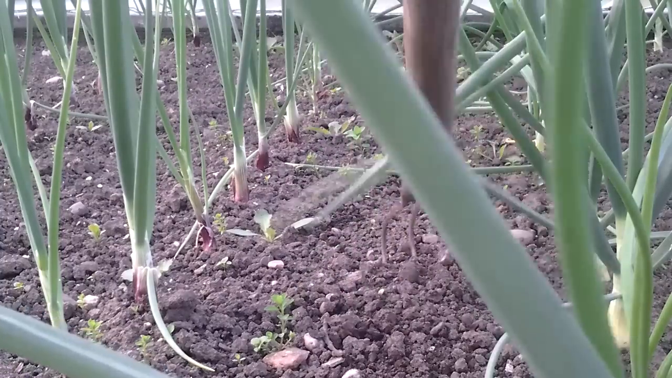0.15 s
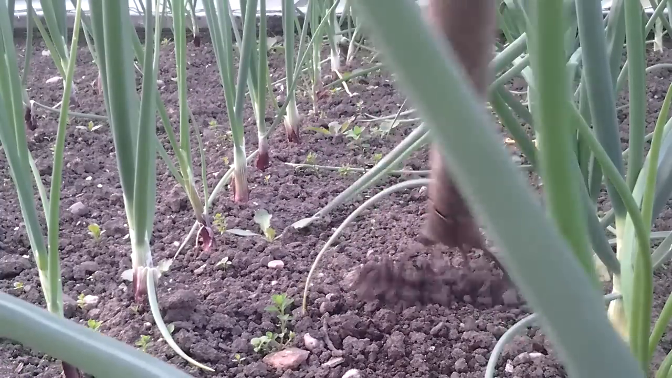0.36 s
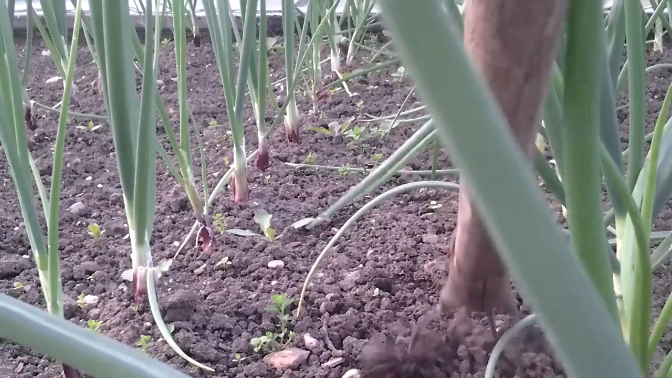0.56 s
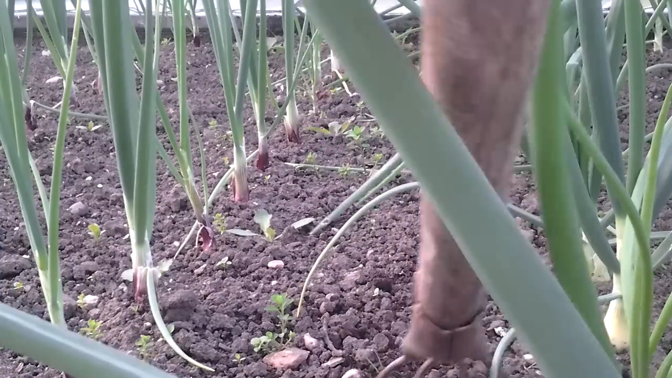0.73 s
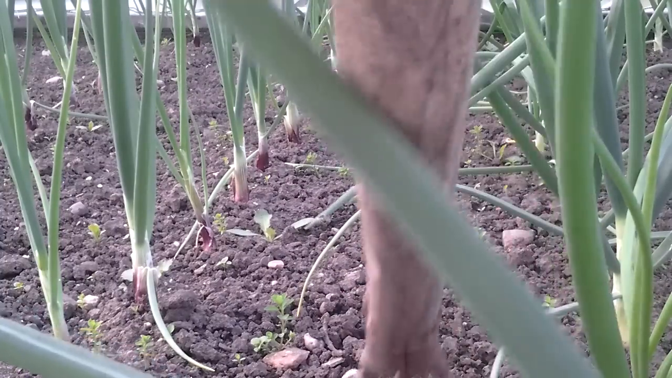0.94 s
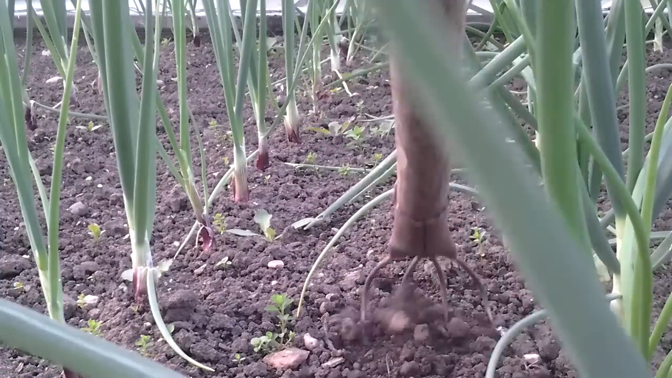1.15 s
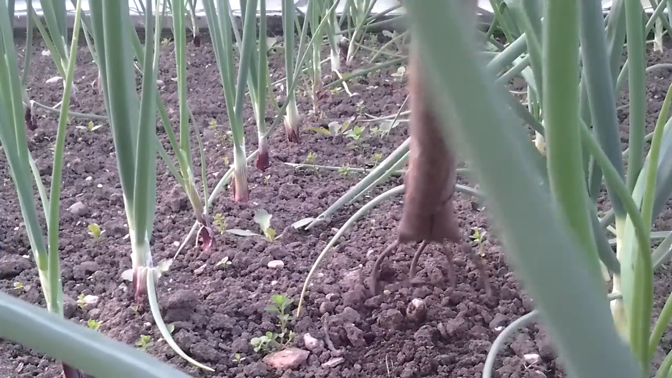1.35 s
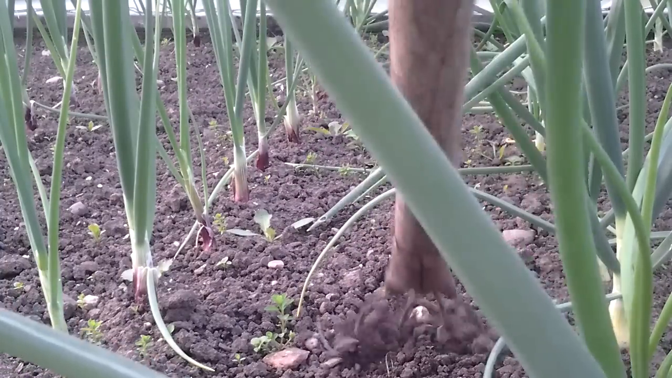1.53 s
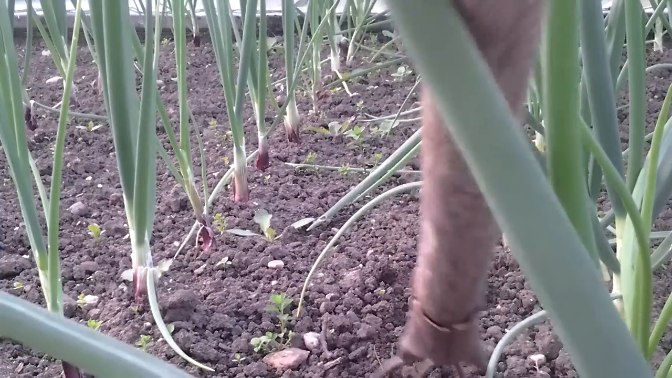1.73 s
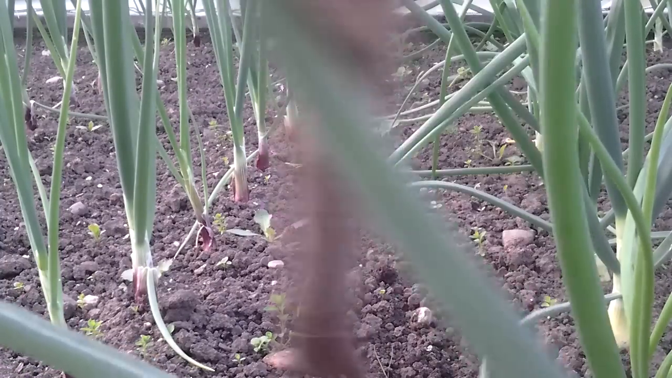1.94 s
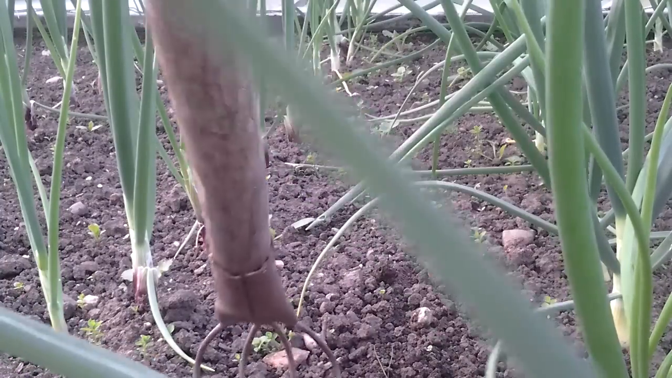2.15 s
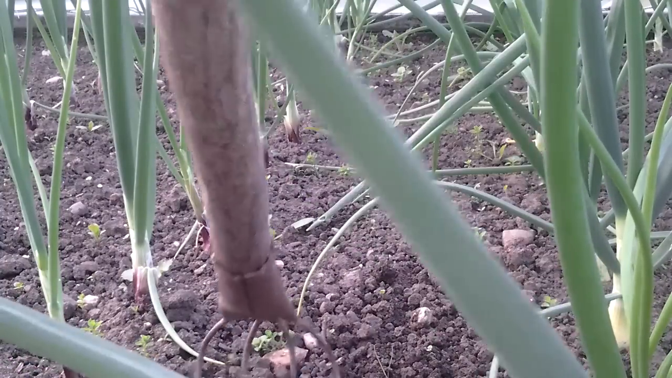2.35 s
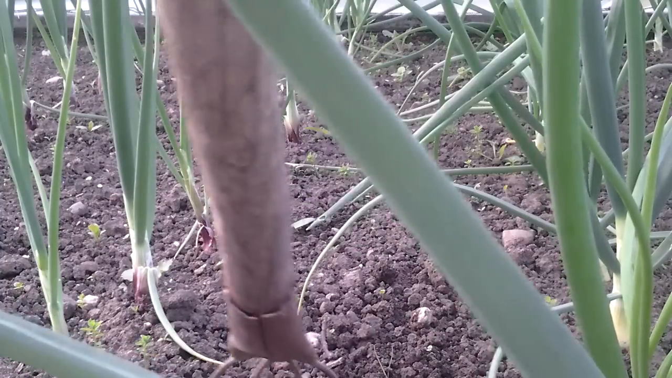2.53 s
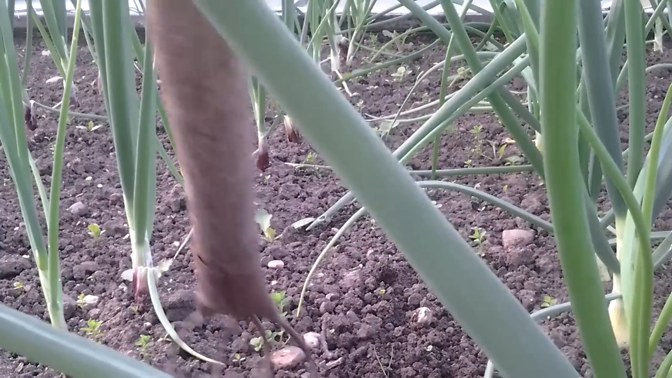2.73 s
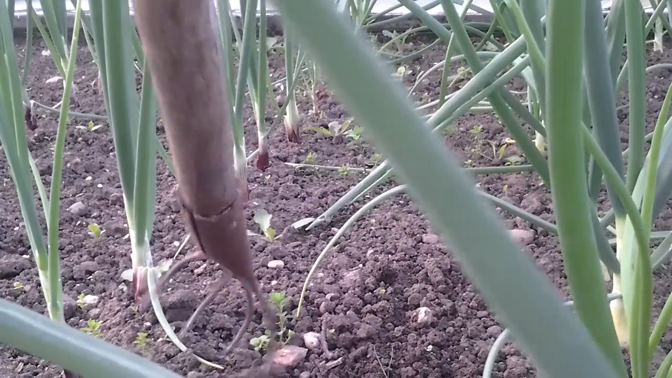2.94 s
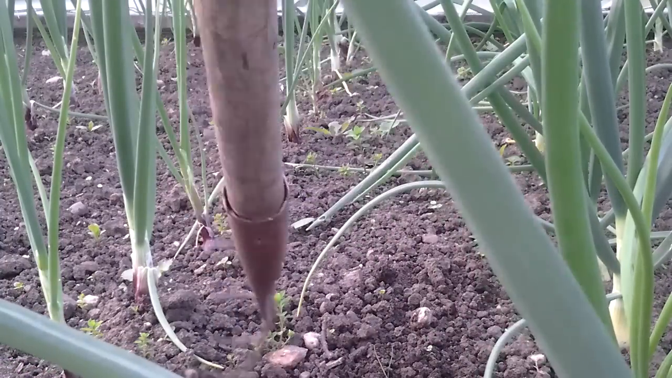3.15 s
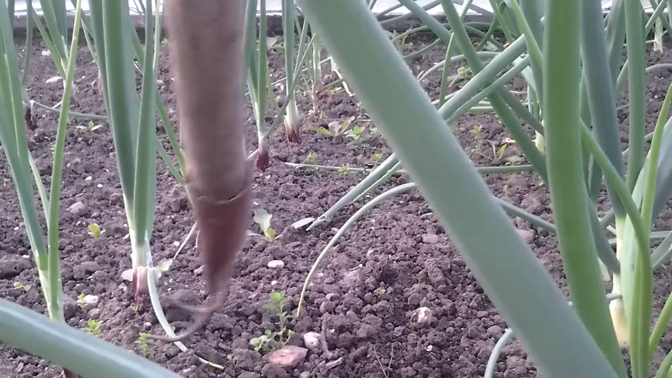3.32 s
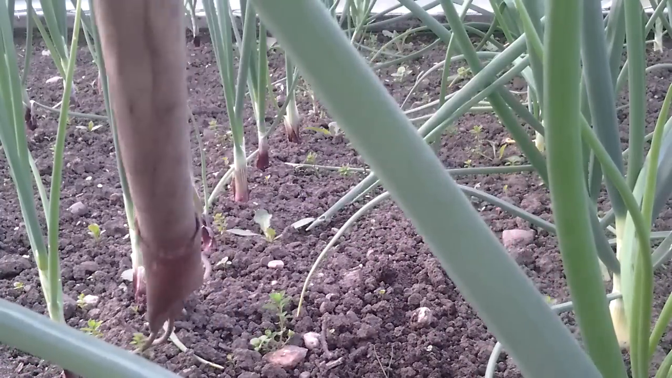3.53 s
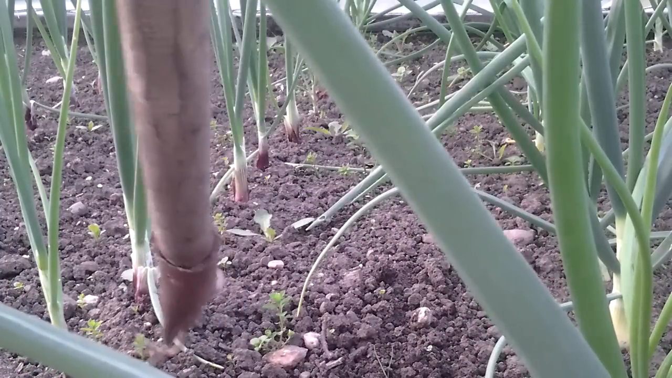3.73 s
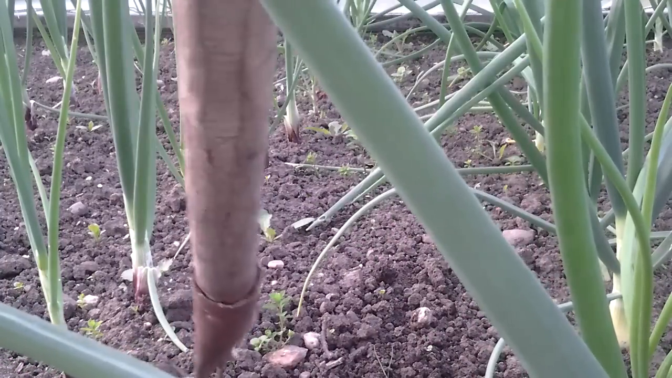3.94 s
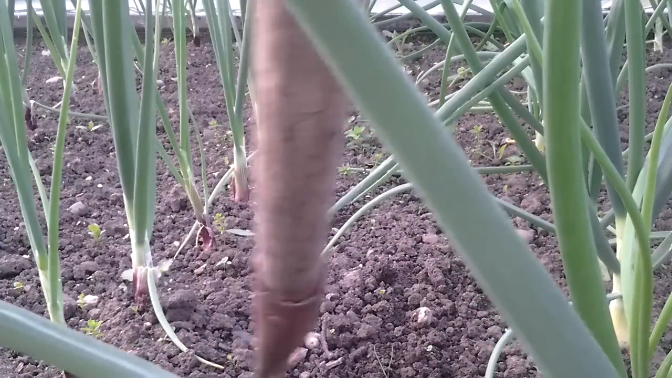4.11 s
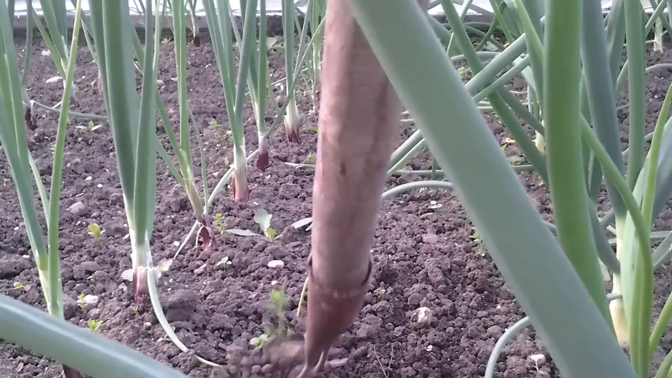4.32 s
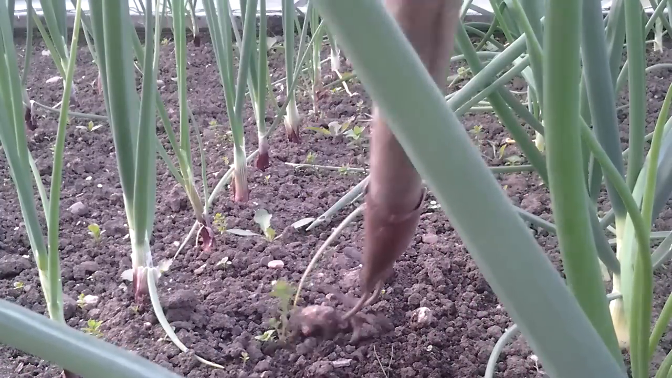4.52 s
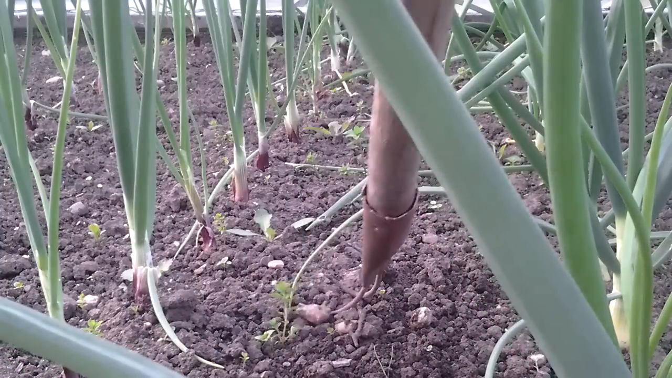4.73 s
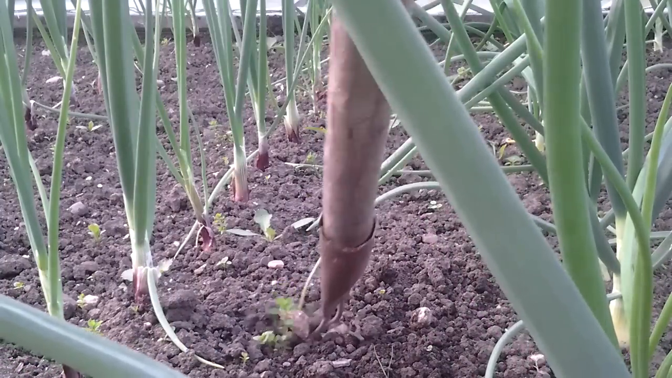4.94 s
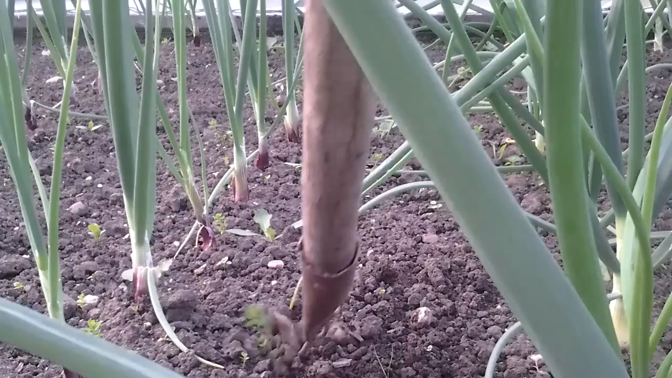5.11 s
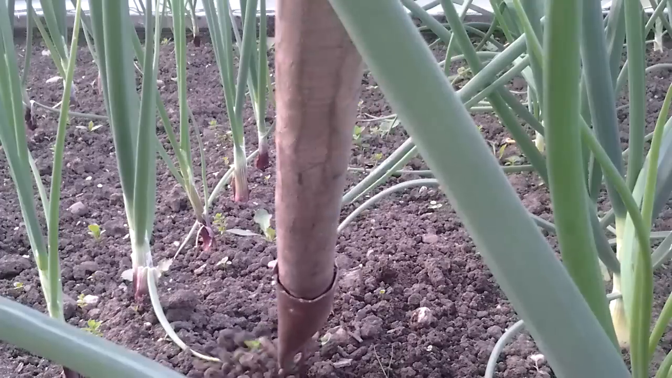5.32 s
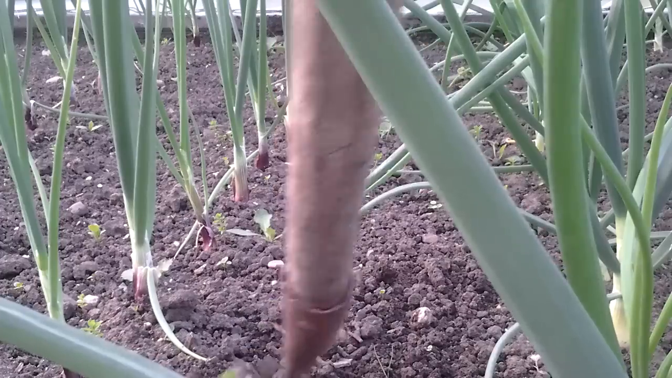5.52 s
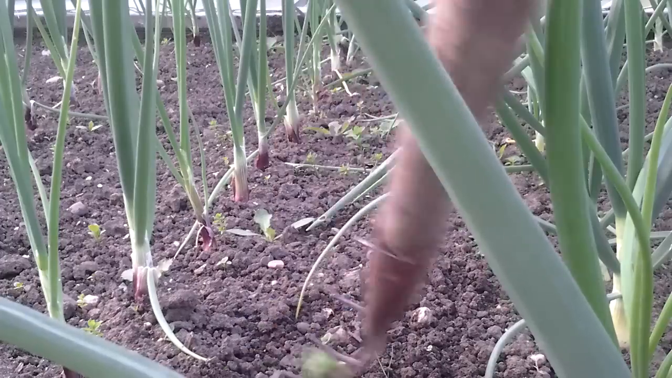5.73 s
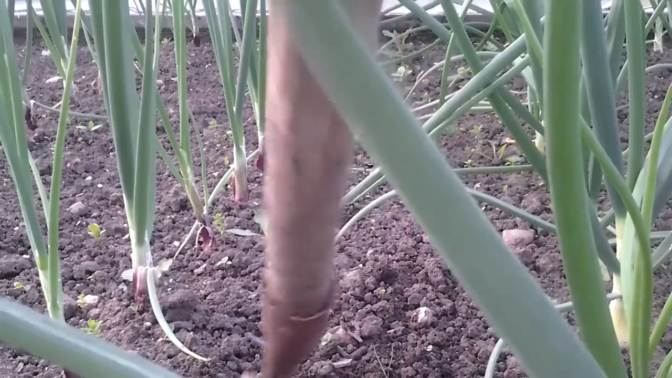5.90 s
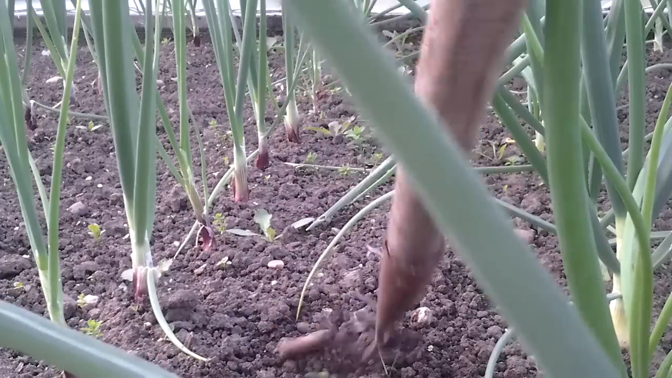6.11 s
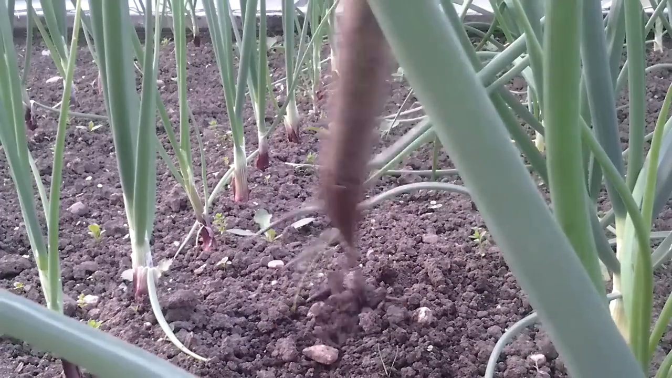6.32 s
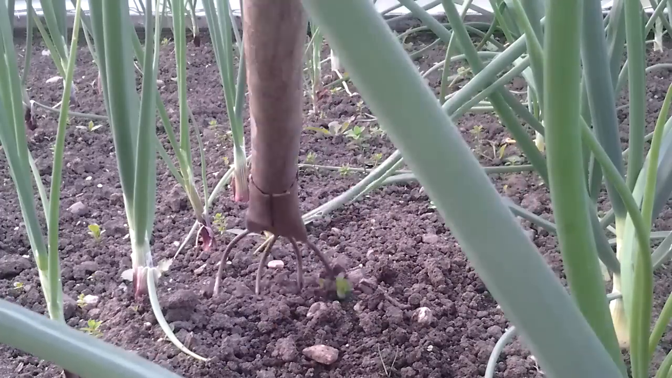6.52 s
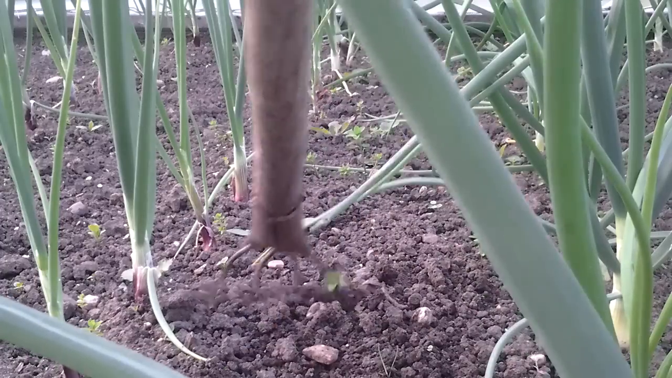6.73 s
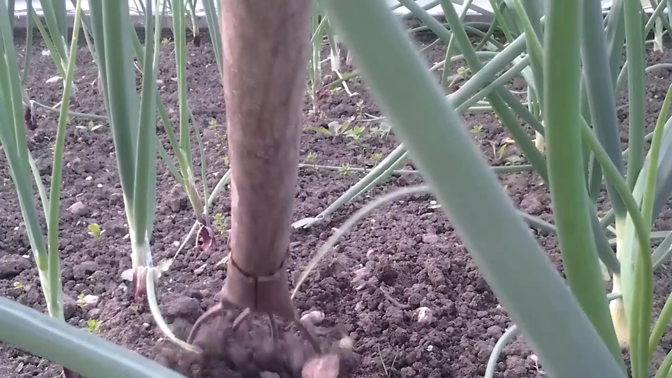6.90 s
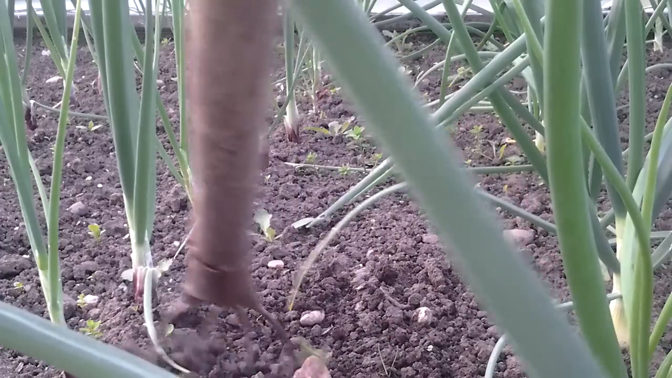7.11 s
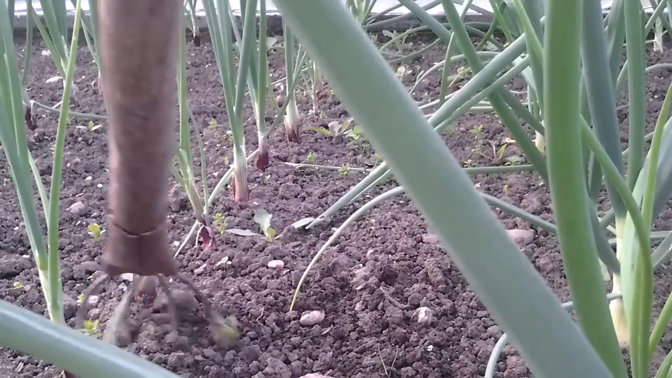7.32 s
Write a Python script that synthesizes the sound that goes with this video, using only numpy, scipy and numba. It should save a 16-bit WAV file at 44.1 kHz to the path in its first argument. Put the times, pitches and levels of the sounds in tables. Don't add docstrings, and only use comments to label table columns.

```python
import sys
import numpy as np
from scipy import signal
from scipy.fft import rfft, irfft
from scipy.io import wavfile
from scipy.ndimage import uniform_filter1d, minimum_filter1d
from numba import njit

SR = 44100
rng = np.random.default_rng(int(sys.argv[2]) if len(sys.argv) > 2 else 0)


def generate_wav(signal):
    frames = np.transpose(np.atleast_2d(signal))
    scaled = np.clip(frames, -1, 1) * 32767
    pcm = np.round(scaled).astype(np.int16)
    wavfile.write(sys.argv[1], SR, pcm)


def ratio_of_db(decibels):
    return 10 ** (np.asarray(decibels, float) / 20)


N = 324576

# f/Hz, level/dB (per Hz)
AIR_SPECTRUM = [(70, 7.5), (140, 0), (280, -0.5), (630, -3), (860, 7.5), (1700, -9.5), (3000, -6.5),
                (6000, -23), (15000, -6)]
AIR_DB, HISS_DB = -51, -58.5
# t/s, length/s, f/Hz, level/dB
ENGINE = [
    (0, .45, 140, -52),
    (2.5, .7, 140, -60),
    (4, .35, 145, -56),
    (4.5, .3, 150, -52),
    (4.5, .4, 371, -55.5),
    (7, .25, 280, -62),
    (6.5, .5, 145, -58),
    (3, 0.56, 371, -68),
]

# t/s, length/s, coarse crumb level/dB, fine grit level/dB (above crumbs)
PULLS = [(-.05, 0.07, -35.5, -4.5), (.1, 0.22, -51, 1), (0.407, 0.099, -42, -1.5), (0.548, 0.3, -36, -1),
         (0.902, 0.27, -43, -8), (1.167, 0.3, -41.5, 1), (1.601, 0.25, -39, -0.5),
         (1.903, 0.12, -45.5, 0.5), (2.138, 0.05, -35.5, -2.5), (2.244, 0.33, -47, 0),
         (2.61, 0.086, -46.5, 2.5), (2.904, 0.32, -49, 1.5), (3.323, 0.14, -52.5, 2),
         (3.688, 0.083, -45, -5), (3.923, 0.27, -47.5, 1.5), (4.369, 0.2, -43, -4),
         (4.756, 0.14, -49.5, -2), (5.02, 0.069, -44.5, -6.5), (5.214, 0.2, -48.5, -1.5),
         (5.533, 0.092, -49, 1), (6.07, 0.17, -50, 0), (6.221, 0.13, -41.5, -4), (6.47, 0.42, -47, -0.5),
         (6.944, 0.17, -39, -3), (7.212, .2, -51, 1.5)]
DIG_IN_DB_PER_S, SETTLE_DB_PER_S = 208, 160
TRICKLE_DB, TRICKLE_GRIT_DB = -55, -1

# peak t/s, level/dB, stone f/Hz, sharp grit level/dB (above stone)
SKIDS = [(.042, -23.5, 1910, 2.5), (.493, -33.5, 1610, 0.5), (.649, -32, 1600, -9), (1.29, -27.5, 2520, -2),
         (1.404, -25, 3000, 1), (1.569, -22.5, 1880, 1.5), (1.693, -32.5, 1770, -13),
         (1.756, -28.5, 2640, 6), (1.829, -26.5, 2420, 0.5), (2.003, -44.5, 2310, 11.5),
         (2.14, -24, 1770, 5.5), (2.156, -24.5, 1724, -6), (2.446, -44.5, 2600, 7),
         (2.532, -38.5, 1980, 2.5), (3.174, -36.5, 1790, 8), (4.288, -36, 1230, 2), (4.48, -33, 1930, 5.5),
         (4.728, -39, 1950, -26), (4.763, -28.5, 2140, -7.5), (5.078, -43, 2340, 6.5),
         (5.399, -40, 1980, -5), (5.548, -34, 1980, 6.5), (5.766, -36, 3050, -1), (6.487, -34, 1680, -13),
         (6.546, -32.5, 2290, -6), (6.815, -36.5, 1330, -22), (6.869, -34, 2090, -5.5),
         (7.158, -33.5, 1990, -6.5)]
# peak t/s, level/dB, stone f/Hz, sharp grit level/dB (above stone)
SNAPS = [(.081, -16, 2784, 2.5), (.183, -32.5, 1300, -23), (.926, -38, 2820, 13.5), (.995, -23, 1620, 3.5),
         (1.11, -23.5, 2750, -10), (1.124, -23.5, 1620, 4.5), (1.175, -25, 2750, 3.5),
         (1.238, -32, 1860, 5.5), (1.248, -20, 1930, -0.5), (1.324, -21.5, 2850, 5), (1.617, -18, 2510, 6),
         (.431, -27, 1825, 6), (2.936, -27, 2940, 0), (2.943, -26, 1750, 1.5), (2.826, -27, 1000, -10),
         (2.13, -31, 2300, 6), (1.809, -29, 2200, 7), (.576, -23, 2390, -4), (1.508, -25.5, 2850, 8.5),
         (1.663, -29, 2480, -4), (1.712, -27, 2200, -9), (1.817, -21, 2530, 6.5), (2.174, -20.5, 1480, 6),
         (2.29, -36.5, 2260, 5.5), (2.301, -30.5, 2500, -24), (2.429, -34, 2600, 1),
         (2.516, -31.5, 1940, -20), (4.457, -39, 1840, 10.5), (5.001, -35, 2640, -14),
         (5.041, -29.5, 2200, -20), (5.247, -34, 1470, -2), (5.582, -20.5, 1950, -1.5),
         (6.369, -27, 1390, -6), (6.61, -28.5, 2330, -15), (6.694, -34.5, 1100, -0.5),
         (6.76, -28.5, 1990, 1.5), (7.215, -26.5, 1174, -35)]
# peak t/s, level/dB, stone f/Hz, sharp grit level/dB (above stone)
JAMS = [(.169, -39, 1900, 0.5), (.436, -31.5, 1850, -2), (.545, -16, 1230, 4.5), (.72, -17, 2650, -2),
        (.793, -23, 2130, -2), (.868, -33.5, 970, 6), (1.27, -34, 1980, -20), (1.341, -19.5, 1800, 6),
        (1.491, -24.5, 2900, 1.5), (2.098, -34, 2670, -2), (3.548, -44, 893, 0), (3.732, -31, 2350, -26),
        (4.422, -34.5, 1780, 4), (5.689, -42.5, 1210, -20), (6.105, -28.5, 1108, -18),
        (6.246, -29.5, 2420, -5), (6.983, -32, 2340, -7), (7.032, -35, 2270, 2.5)]
# peak t/s, level/dB
PEBBLES = [(.265, -44), (2.185, -24.5), (2.38, -39.5), (2.555, -42), (2.635, -41), (2.675, -36),
           (2.692, -36.5), (2.708, -38.5), (2.838, -33.5), (2.363, -47), (2.908, -46), (4.372, -45),
           (4.44, -44), (4.55, -44), (4.577, -47), (4.99, -48), (5.058, -39), (5.13, -46), (5.308, -45),
           (5.386, -39), (5.41, -39.5), (6.128, -43), (6.265, -42), (6.96, -39), (7.105, -56), (7.283, -49)]
PEBBLE_HZ, PEBBLE_GRIT_DB = 2200, 4
# peak t/s, level/dB, stone f/Hz, sharp grit level/dB (above stone)
GRINDS = [(.299, -37, 1406, -8), (.4, -37.5, 2380, -5), (.735, -27, 2200, -4), (.835, -37.5, 1290, 3.5),
          (.962, -34.5, 2100, 2), (1.453, -37, 2650, 4.5), (1.889, -38.5, 2280, 6),
          (2.366, -38, 3300, -1.5), (2.592, -41, 2500, 6), (3.039, -36, 1350, -5), (3.684, -45, 1940, 6.5),
          (3.957, -37, 1936, 5.5), (4.119, -37.5, 2400, 2.5), (4.199, -57, 2070, -6), (4.39, -44, 2200, 7),
          (4.501, -33.5, 1950, -1.5), (4.565, -32.5, 1920, -19), (5.114, -49.5, 2600, 11),
          (6.084, -37, 1170, 4.5), (6.145, -27, 2130, 7.5), (6.285, -37, 870, -4), (6.456, -39, 1580, 1),
          (7.06, -36.5, 2010, -1)]
# peak t/s, level/dB, stone f/Hz, sharp grit level/dB (above stone)
MORE_SNAPS = [(.389, -35, 1950, -1), (.423, -29, 2000, -2), (.471, -31.5, 2130, -2),
              (.505, -34, 2090, -2), (.537, -21, 1270, 2), (.586, -27, 2360, 2), (.596, -29, 1180, 3),
              (.662, -37, 1510, 0), (.687, -31, 2100, 5), (.705, -27, 2297, 6), (.787, -26.5, 2080, 8),
              (.948, -38, 2030, 6), (1.032, -44, 2230, -8), (1.302, -32, 1910, 2),
              (1.313, -32, 1800, -1), (1.335, -28.5, 1815, -1), (1.416, -26.5, 1990, 6.5),
              (1.611, -21.5, 2570, 5), (1.969, -46, 2200, 4), (6.216, -44, 1500, 8.5),
              (6.24, -41, 2300, -5), (6.302, -36, 1900, 2), (6.345, -35.5, 2600, -4),
              (6.43, -44, 2000, 3), (6.501, -42, 1400, 4.5), (6.56, -40, 2010, 2), (6.748, -40, 1490, 3),
              (6.787, -38, 1350, 2), (6.917, -42, 2200, 0), (6.977, -37, 2870, -3),
              (7.022, -41, 2300, 8), (7.085, -41, 1990, 4)]
SNAP_MS, SKID_MS, JAM_MS, GRIND_MS = (1.9, 3.3), (2.4, 12.5), (7.5, 3.8), (9.5, 11.5)
MIDDLING_DB, BRIEFER_PER_DB = -30, 0.0047

# t/s, peak level/dB, ring f/Hz
CRACKS = [(.0445, -24, 4270), (0.079, -10, 5730), (.08, -21, 2730), (.264, -43, 3000), (0.544, -21, 4400),
          (0.717, -16, 2735), (1.109, -28, 2730), (1.814, -19.5, 2200), (1.246, -15, 5860),
          (1.3215, -17, 4200), (1.3383, -14, 1810), (1.507, -18, 5930), (1.6095, -18, 4300),
          (1.6157, -10, 4530), (1.66, -28, 2510), (1.755, -26, 4300), (2.1699, -5, 4500),
          (2.174, -17, 4720), (2.298, -30, 2420), (3.172, -29, 8500), (3.551, -40, 5000),
          (4.726, -35, 1950), (4.99, -45, 4000), (5.545, -29, 4500), (5.58, -23.5, 2600),
          (6.263, -36, 4200), (6.7576, -29.5, 1090)]
CRACK_CYCLES, SPIKE_HZ, SPIKE_DB = 6.5, 9600, -18
# f/Hz, width/Hz, level/dB
CLAW_MODES = [(1020, 580, -9.5), (1950, 59, -2.5), (2530, 118, -4.5), (2788, 26, 1.5), (5790, 71, -5)]

# t/s, length/s, start f/Hz, end f/Hz, level/dB
WHISTLES = [(.05, 0.11, 2520, 2520, -58.5), (.185, 0.035, 2500, 2480, -62), (.735, 0.038, 2200, 2140, -45),
            (2.69, 0.057, 2060, 1914, -59.5), (2.743, 0.14, 1950, 1990, -59), (3.04, 0.19, 2360, 2416, -65),
            (4.012, 0.021, 2460, 2330, -61), (4.116, 0.062, 2450, 2310, -59),
            (4.215, 0.083, 2400, 2470, -66), (4.735, 0.029, 1950, 1950, -71),
            (5.263, 0.084, 2130, 2050, -66), (5.434, 0.12, 1970, 2060, -66), (5.47, 0.089, 2270, 2420, -66)]
# t/s, start f/Hz, level/dB
CHIPS = [(2.798, 3300, -54), (2.959, 3900, -55), (3.097, 3260, -55), (3.154, 3670, -61), (3.26, 3150, -55),
         (3.35, 3490, -53), (3.457, 3500, -52.5), (3.56, 3530, -52.5), (3.671, 3520, -52.5),
         (3.777, 3610, -50), (3.88, 3500, -51), (3.991, 3560, -49), (4.104, 3520, -56)]
CHIP_RISE = 1.31
# t/s, length/s, centre f/Hz, level/dB
TRILLS = [
    (3.117, 0.37, 2372, -52.5),
    (3.72, 0.2, 2000, -63),
    (3.926, 0.14, 1917, -54),
    (6.839, 0.055, 1970, -50),
    (7.042, 0.145, 1990, -54.5),
    (5.494, 0.13, 2800, -64),
]
# t/s, length/s, start f/Hz, middle f/Hz, end f/Hz, level/dB
ARCHES = [
    (4.054, 0.072, 2400, 2470, 2200, -53),
    (4.3, .024, 3600, 4750, 5100, -55),
    (4.303, .075, 3080, 3200, 3300, -62),
]
# t/s, length/s, start f/Hz, end f/Hz, level/dB
SLURS = [
    (4.594, .035, 4200, 4700, -60),
    (4.688, 0.088, 2960, 3770, -61.5),
    (5.078, 0.045, 4240, 4170, -58),
    (5.088, 0.055, 5300, 5560, -60),
    (5.18, 0.071, 4130, 2740, -57),
    (5.265, 0.069, 4520, 4590, -61),
    (5.588, .08, 4500, 4190, -57),
    (5.664, 0.035, 4140, 4400, -56.5),
    (5.939, .026, 4420, 4350, -67),
    (7.197, 0.015, 3810, 5100, -58.5),
]

# f/Hz, level/dB
PORT_RESPONSE = [(40, -38), (110, -19.5), (250, -11), (1000, -2), (2300, 2), (3200, 0), (4400, 5),
                 (5200, -5), (6300, -9.5), (8000, -9), (15000, -41)]


def shape(x, points):
    hz, db = np.transpose(points)
    grid = np.maximum(np.fft.rfftfreq(4096, 1 / SR), 1)
    cep = irfft(np.log(ratio_of_db(np.interp(np.log(grid), np.log(hz), db))))
    cep[1:2048] *= 2
    cep[2049:] = 0
    impulse = irfft(np.exp(rfft(cep)))[:2048]
    return signal.oaconvolve(x, impulse)[:N]


def level(x, db):
    return x * ratio_of_db(db) / np.sqrt(np.mean(x ** 2))


def walk(rate):
    k = int(SR / rate)
    steps = np.repeat(rng.standard_normal(N // k + 1), k)
    return uniform_filter1d(steps, k // 2 + 1)[:N]


@njit
def ring(start, hz, cycles, size):
    out = np.zeros(N)
    for k in range(len(start)):
        turn = np.exp(hz[k] / SR * (2j * np.pi - 1 / cycles[k]))
        swing, soft, soften = size[k] + 0j, 1., np.exp(-2 * hz[k] / SR)
        for i in range(start[k], min(start[k] + int(4.5 * cycles[k] * SR / hz[k]), N)):
            if i >= 0:
                out[i] += swing.imag * (1 - soft)
            swing *= turn
            soft *= soften
    return out


def grains(s, hz, db, cycles, scatter_db):
    luck = rng.random(s.shape + (3,))
    size = ratio_of_db(db - scatter_db * np.log(1 - luck[..., 0])) * np.sign(luck[..., 1] - .5)
    turns = cycles * (.5 + luck[..., 2])
    start = (s * SR).astype(np.int64)
    return ring(start.ravel(), np.clip(hz, 60, SR / 3).ravel(), turns.ravel(), size.ravel())


def add(out, start, length, hz, db, fade=0.15):
    u = np.arange(int(length * SR)) / (length * SR)
    path = np.interp(u, np.linspace(0, 1, len(hz)), hz)
    pitch = uniform_filter1d(path, len(u) // 4 + 1, mode="nearest")
    swell = np.clip(np.minimum(u, 1 - u) / fade, 0, 1)
    note = ratio_of_db(db + 6.0) * swell * np.sin(2 * np.pi * np.cumsum(pitch) / SR)
    i = max(int(start * SR), 0)
    out[i:i + len(u)] += note[:N - i]


def air():
    drone = np.zeros(N)
    for start, length, hz, db in ENGINE:
        add(drone, start, length, hz * (1 + .015 * rng.standard_normal(6)), db - 5, fade=0.21)
    drone *= ratio_of_db(2.7 * walk(16))
    bed = level(shape(rng.standard_normal(N), AIR_SPECTRUM), AIR_DB)
    return drone + bed * ratio_of_db(0.9 * walk(2.97) + 0.68 * walk(19))


def drag():
    t = np.arange(N) / SR
    coarse_db = np.full(N, 1. * TRICKLE_DB)
    fine_db = coarse_db + TRICKLE_GRIT_DB
    for start, length, db, grit_db in PULLS:
        before_db = DIG_IN_DB_PER_S * (start - t)
        after_db = SETTLE_DB_PER_S * (t - start - length)
        pull_db = db - np.maximum(np.maximum(before_db, after_db), 0)
        coarse_db = np.maximum(coarse_db, pull_db)
        fine_db = np.maximum(fine_db, pull_db + grit_db)
    press = np.clip(walk(35), -3, 1.1)

    def bed(count, hz, spread, cycles, db):
        tone = hz * np.exp(spread * rng.standard_normal(count))
        even = level(grains(rng.random(count) * N / SR, tone, 0, cycles, 1.9), 0)
        return even * ratio_of_db(db + 2.5 * press + 1.8 * walk(60))

    crumbs = bed(count=6000, hz=1809, spread=.42, cycles=9.8, db=coarse_db - 7.5)
    grit = bed(count=11000, hz=4440, spread=0.2166, cycles=32.0, db=fine_db - 7.0)
    clods = bed(count=6000, hz=455, spread=0.63, cycles=1.73, db=0.69 * coarse_db - 21)
    ground = bed(count=1800, hz=123.7, spread=0.23, cycles=0.99, db=0.77 * coarse_db - 25.0)
    sand = bed(count=6000, hz=6550, spread=0.203, cycles=1.6, db=fine_db - 14.5)
    pebbles = bed(count=1300, hz=2600, spread=0.4005, cycles=12.0, db=coarse_db - 12.0)
    return crumbs + grit + clods + ground + sand + pebbles


def crunches():
    pebbles = [(s, db, PEBBLE_HZ, PEBBLE_GRIT_DB) for s, db in PEBBLES]
    kinds = ((SNAPS, SNAP_MS), (SKIDS, SKID_MS), (JAMS, JAM_MS), (GRINDS, GRIND_MS),
             (pebbles, SNAP_MS), (MORE_SNAPS, SNAP_MS))
    events = np.array([(*row, *ms) for rows, ms in kinds for row in rows])
    s, db, hz, grit_db, rise_ms, fall_ms = events.T[..., None]
    briefer = ratio_of_db(BRIEFER_PER_DB * (MIDDLING_DB - db))
    rise, fall = rise_ms * briefer / 1000, fall_ms * briefer / 1000
    span = 1.5 * rise + 2.5 * fall

    def swarm(count, pitch, spread, cycles, share_db):
        size = (len(s), count)
        lag = (np.arange(count) + rng.random(size)) / count * span - 1.5 * rise
        tone = pitch * np.exp(spread * rng.standard_normal(size))
        sparse_db = 10 * np.log10(4 * span * tone / cycles / count)
        shape_db = -8.0 * np.maximum(-lag / rise, lag / fall)
        return grains(s + lag - .001, tone, db + share_db + sparse_db + shape_db, cycles, 1.58)

    stone = swarm(count=12, pitch=hz, spread=0.034, cycles=7.5, share_db=-10.5)
    crumb = swarm(count=24, pitch=np.sqrt(1900 * hz), spread=0.37, cycles=2.42, share_db=-6)
    grit = swarm(count=30, pitch=4500, spread=0.1513, cycles=8.7, share_db=grit_db - 8.0)
    dust = swarm(count=60, pitch=12600, spread=0.15, cycles=4.4, share_db=grit_db / 2 - 5.5)
    shard = swarm(count=12, pitch=6050, spread=0.101, cycles=11.0, share_db=grit_db / 2 - 13.5)
    clod = swarm(count=8, pitch=638, spread=0.35, cycles=3.5, share_db=-15.0)
    return stone + crumb + grit + dust + shard + clod


def cracks():
    s, db, hz = np.transpose(CRACKS)
    at, even = (s * SR).astype(np.int64), np.ones(len(s))
    body = ring(at, hz, CRACK_CYCLES * even, ratio_of_db(db))
    spike = ring(at, SPIKE_HZ * even, 1.0 * even, ratio_of_db(db + SPIKE_DB))
    return body + spike


def tines(soil):
    claw = np.zeros(N)
    for hz, width, db in CLAW_MODES:
        claw += ratio_of_db(db) * signal.lfilter(*signal.iirpeak(hz, hz / width, SR), soil)
    return claw


def whistles():
    song = np.zeros(N)
    for start, length, *hz, db in WHISTLES + SLURS + ARCHES:
        add(song, start, length, hz, db, fade=0.088)
    return song


def chips():
    song = np.zeros(N)
    for start, low, db in CHIPS:
        top = CHIP_RISE * low
        rise = [0.9 * low, 0.197 * low + .8 * top, 0.88 * top]
        add(song, start, .021, rise, db - 1.5, fade=0.31)
        add(song, start + .024, .02, [low - 150, top - 350], db - 7)
    return song


def trills():
    burr = np.zeros(N)
    for start, length, hz, db in TRILLS:
        add(burr, start, length, [hz, hz], db, fade=0.12)
    low_pass = signal.butter(2, 125, fs=SR, output="sos")
    flutter = level(signal.sosfilt(low_pass, rng.standard_normal(N)), 0)
    return burr * (0.41 + 0.5 * flutter)


def birds():
    direct = (whistles() + chips()) * ratio_of_db(2.7 * walk(70)) + trills()
    t = np.arange(SR // 2) / SR
    tail = rng.standard_normal(len(t)) * ratio_of_db(-60 * t / .3)
    blur = signal.fftconvolve(direct, tail / np.linalg.norm(tail))[:N]
    return direct + ratio_of_db(-10) * blur


def shaft_knock(soil):
    add(soil, start=3.54, length=0.028, hz=[505, 505], db=-49)


def scene():
    soil = crunches() + cracks() + drag()
    shaft_knock(soil)
    mono = 0.93 * soil + tines(soil) + birds() + air()
    return np.array([mono, mono])


def mute_faint_treble(x):
    above_hz, calm_db, cut_db, slope, attack_db = 5200, -53, 1, .42, 12
    f, t, z = signal.stft(x, SR, nperseg=2048, noverlap=1024, window="cosine")
    at = np.minimum(t * SR, N - 1).astype(int)
    quick_db = 10 * np.log10(uniform_filter1d(x ** 2, 256) + 1e-12)
    held_db = uniform_filter1d(quick_db, 2048)[at]
    peak_db = -minimum_filter1d(-quick_db, 1024)[at]
    sharp = peak_db - held_db > attack_db
    busy_db = slope * np.maximum(held_db - calm_db, 0) * ~sharp
    patchy_db = 2.2 * np.repeat(rng.standard_normal((33, len(t))), 32, axis=0)[:len(f)]
    typical = np.median(np.abs(z[(f > 9000) & (f < 14000)]))
    reach = np.clip(np.log2(np.maximum(f, 1) / above_hz) / .75, 0, 1)[:, None]
    z[np.abs(z) < reach * typical * ratio_of_db(cut_db + busy_db + patchy_db)] = 0
    return signal.istft(z, SR, nperseg=2048, noverlap=1024, window="cosine")[1][:N]


def top_cut(x):
    return signal.sosfilt(signal.butter(12, 15320, fs=SR, output="sos"), x)


def record(dry):
    hiss_spectrum = [(25, -3), (60, -40), (300, -9.0), (5500, -15.5), (9000, -11.5), (14000, -12)]  # Hz, dB
    hiss = shape(rng.standard_normal(N), hiss_spectrum)
    mono = shape(dry[0], PORT_RESPONSE) + level(hiss, HISS_DB)
    top = signal.ellip(8, .2, 80, 14550, fs=SR, output="sos")
    mono = mute_faint_treble(signal.sosfilt(top, mono))
    skew = mono * ratio_of_db(-39.5) * walk(900)
    return top_cut(np.array([mono + skew, mono - skew]))


dry = scene()
out = record(dry)
generate_wav(out)
```